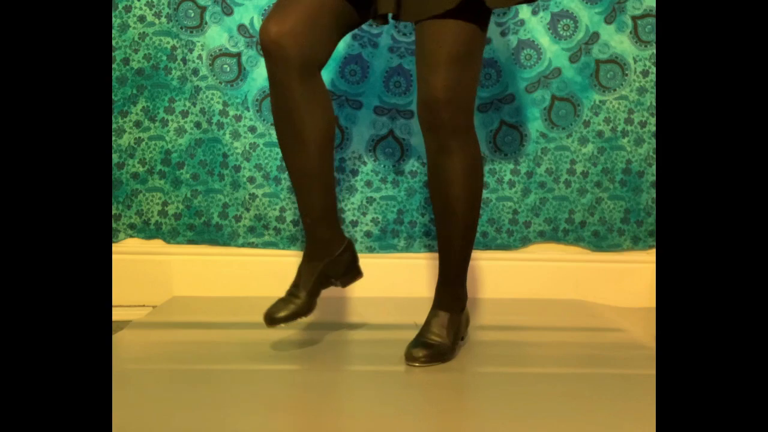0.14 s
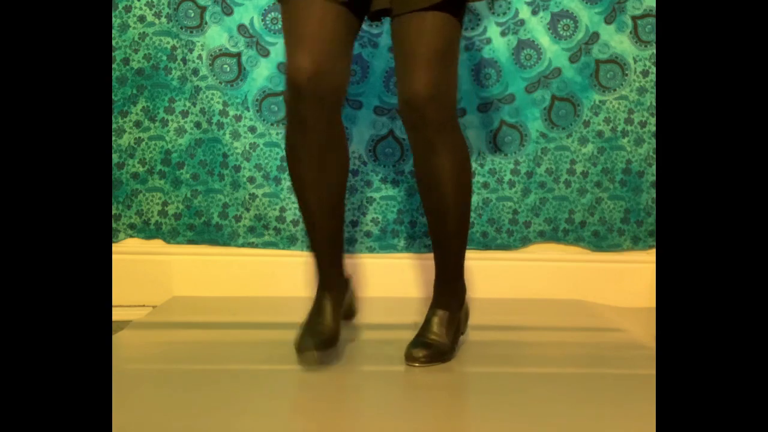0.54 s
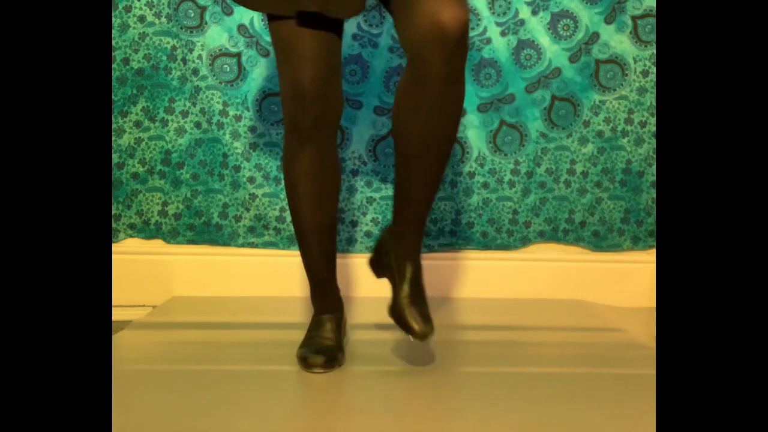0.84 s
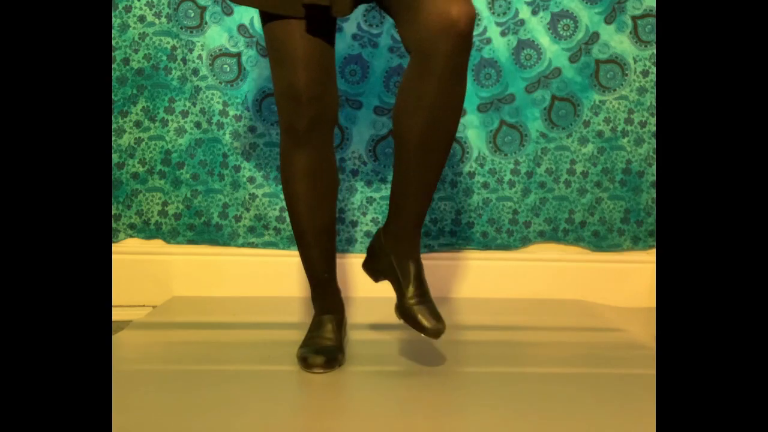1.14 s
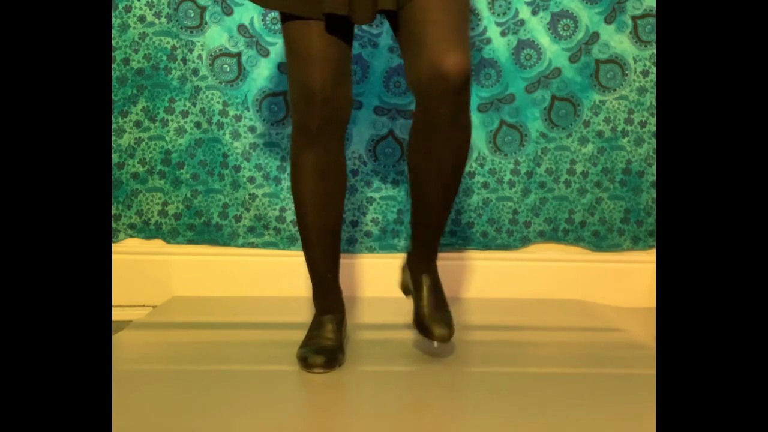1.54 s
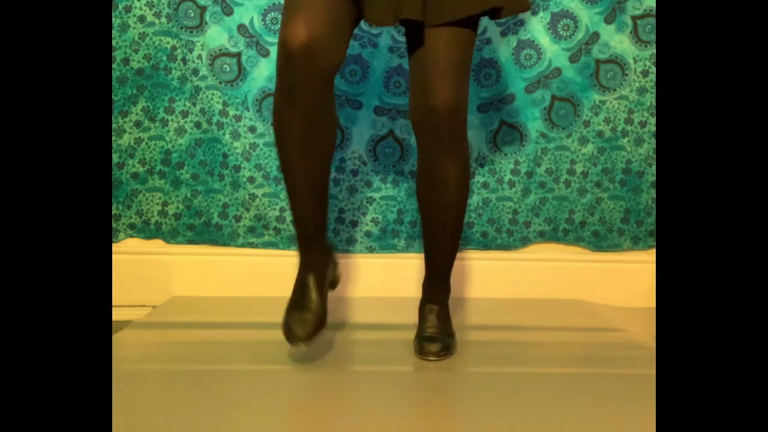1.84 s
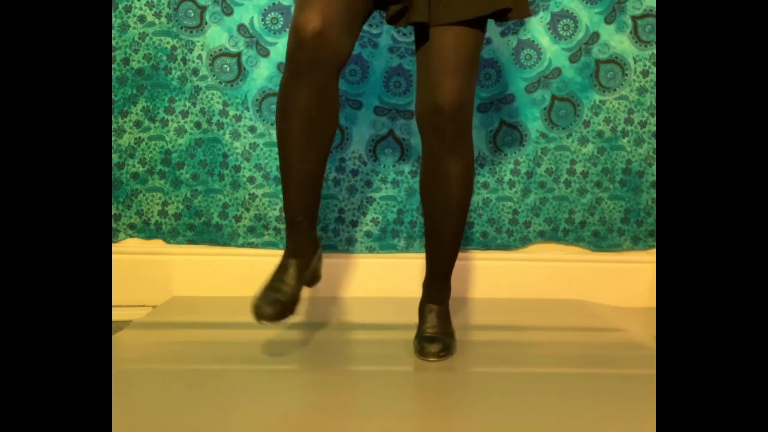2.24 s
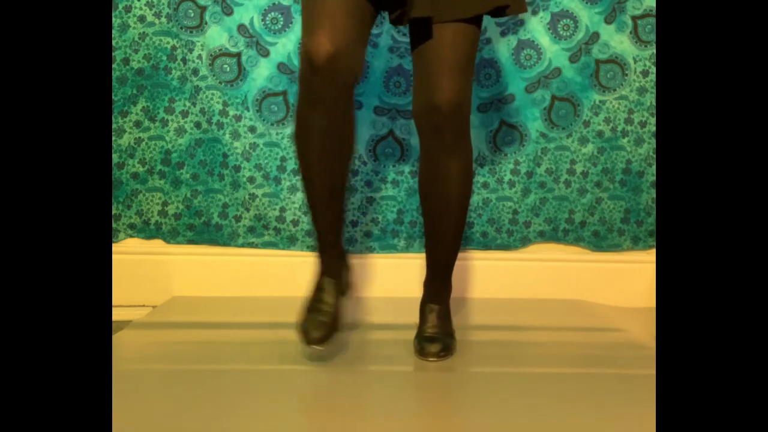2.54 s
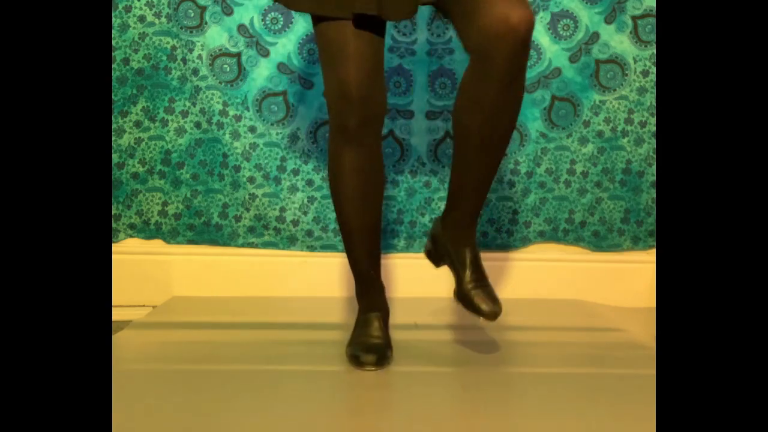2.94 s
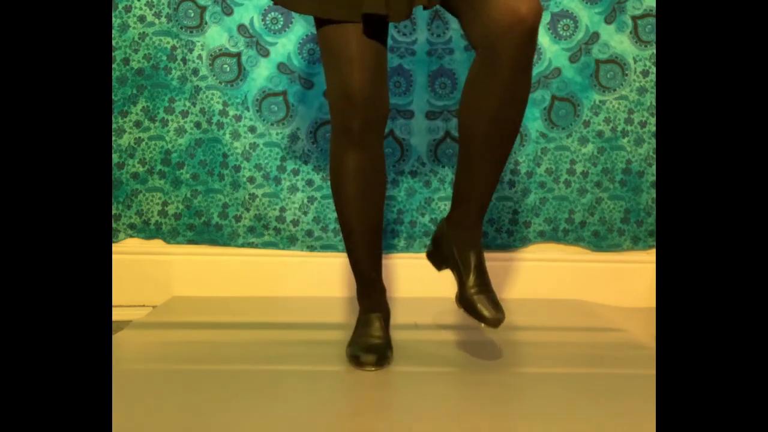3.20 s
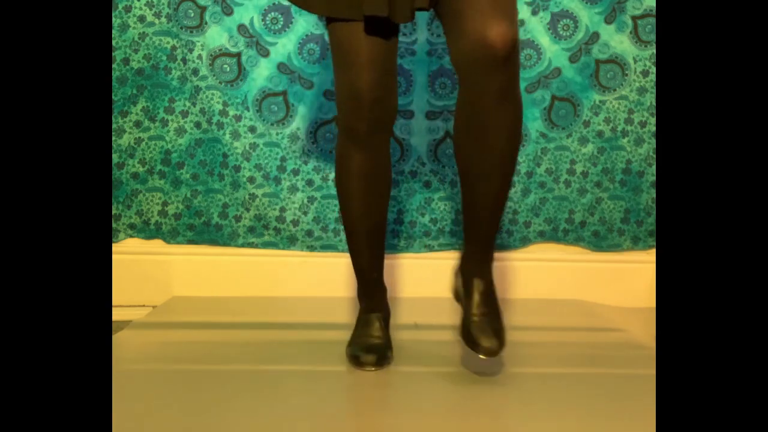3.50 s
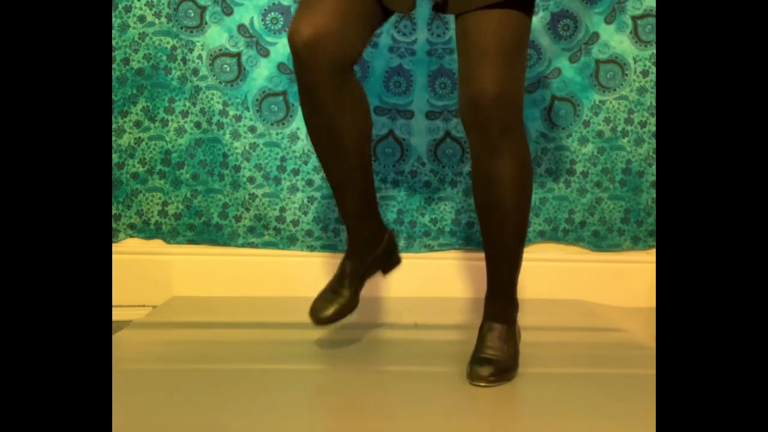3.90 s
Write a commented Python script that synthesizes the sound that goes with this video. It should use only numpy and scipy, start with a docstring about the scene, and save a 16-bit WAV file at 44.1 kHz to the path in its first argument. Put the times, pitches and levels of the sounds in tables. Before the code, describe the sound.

Metal tap shoes land on a hard board four times, about once a second, each a sharp clack with a low thud.

```python
"""A tap dancer hops from foot to foot on a dance board in a small, quiet room, landing once a second.
Each metal toe plate strikes the board and excites its damped modes; the walls return echoes and
reverberation, and the floor booms as it takes the weight. Sometimes a plate touches again lightly.
At first some metal is still ringing; a faint tick, like a clock's, marks the seconds over the hiss."""
import sys
import numpy as np
from scipy import signal
from scipy.fft import rfft, irfft
from scipy.io import wavfile

SR = 44100
rng = np.random.default_rng(int(sys.argv[2]) if len(sys.argv) > 2 else 0)


def transcribe(u):
    """Save the signal u as a 16-bit wav file named by the first command-line argument.

    u: samples, shape (n,) or (channels, n), limited to [-1, 1]; the rate is SR.
    q: integer samples, one column per channel.
    """
    v = np.clip(np.atleast_2d(u).T, -1, 1)
    q = np.round(v * 32767).astype(np.int16)
    wavfile.write(sys.argv[1], SR, q)


N = 178998
AGE = np.arange(SR) / SR  # seconds since a blow


def from_db(db):
    """Amplitude ratio of a level in decibels."""
    return 10 ** (np.asarray(db) / 20)


def rms_one(x):
    """Normalisation to unit rms."""
    return x / np.sqrt(np.mean(x ** 2) + 1e-20)


def at_hz(points, hz):
    """Interpolation of a table on a log-frequency axis."""
    table_hz, value = np.transpose(points)
    return np.interp(np.log(hz + 1), np.log(table_hz), value)


def add(out, start_s, sound):
    """Superposition: a sound joins the mix at start_s."""
    i = max(round(start_s * SR), 0)
    out[i:i + len(sound)] += sound[:len(out) - i]


def ring(modes):
    """Free vibration of damped modes; neighbours start in opposite phase, so close ones swell and beat."""
    return sum((-1) ** k * from_db(db - 60 * AGE / t60) * np.sin(2 * np.pi * hz * AGE)
               for k, (hz, db, t60) in enumerate(modes))


def even_noise(size, window=256, evenness=0.14):
    """Spectral compression spreads the energy of noise a little more evenly over time and frequency."""
    cells = signal.stft(rng.standard_normal(size), nperseg=window)[2]
    return signal.istft(cells / (abs(cells) + 1e-12) ** evenness, nperseg=window)[1][:size]


def faint_knock(low_hz, high_hz, rise_s, fade_s):
    """Reverberation blurs a small contact into a band of noise that swells and decays exponentially."""
    band = signal.butter(2, [low_hz, high_hz], "band", fs=SR, output="sos")
    noise = rms_one(signal.sosfilt(band, rng.standard_normal(SR)))
    return noise * (1 - np.exp(-AGE / rise_s)) * np.exp(-AGE / fade_s)


def air(level_db=-46.5, whine_hz=8330, whine_width_hz=45):
    """Stationary noise: low rumble, faint hiss and a narrow band heard as a thin whine."""
    # spectrum of the still room: frequency_hz, density_db
    spectrum = [(13, -35), (22, -5), (74, -5), (109, -16.5), (160, -15.5), (189, -23.5), (229, -21.5),
                (275, -32), (340, -23.5), (410, -31), (470, -22.5), (580, -30.5), (850, -26), (1100, -33.5),
                (3500, -42.5), (5000, -42.5), (8030, -48), (16000, -55)]
    hz = np.arange(N // 2 + 1) * SR / N
    whine = from_db(-42.5) * np.exp(-((hz - whine_hz) / whine_width_hz) ** 2)  # on the table's dB scale
    gain = np.hypot(from_db(at_hz(spectrum, hz)), whine)
    return from_db(level_db) * rms_one(irfft(rfft(rng.standard_normal(N)) * gain, N))


def clock(first_s=0.392, tick_db=-53.5, tock_db=-56.5, tock_late_s=0.015):
    """Periodic impacts, far and dull, one a second; each tock is softer and a little late."""
    out = np.zeros(N)
    for k, start_s in enumerate(np.arange(first_s, N / SR, 1)):
        late_s, level_db = (tock_late_s, tock_db) if k % 2 else (0, tick_db)
        tick = faint_knock(low_hz=1200, high_hz=2400, rise_s=0.0045, fade_s=0.029)
        add(out, start_s + late_s, from_db(level_db) * tick)
    return out


def fading_ring(wash_db=-49):
    """Free decay: metal struck earlier rings out in a wash of reverberation."""
    # modes of the metal: pitch_hz, level_db, t60_s
    metal_modes = [(333, -37.5, 0.246), (1534, -45.5, 0.33), (1620, -49.5, .4), (1911, -57.5, .5),
                   (3801, -62, .7), (4050, -61.5, .6), (5566, -68.5, .8), (7127, -69.5, 0.93)]
    wash = faint_knock(low_hz=700, high_hz=3600, rise_s=0.0024, fade_s=0.09)
    out = np.zeros(N)
    add(out, 0, ring(metal_modes) + from_db(wash_db) * wash)
    return out


def touches():
    """Grazing contact: a plate meets the board again just after a landing, thin and bright."""
    # light second contacts: start_s, level_db
    contacts = [(0.7400, -48.5), (2.8150, -47), (3.869, -53.5)]
    out = np.zeros(N)
    for start_s, level_db in contacts:
        graze = faint_knock(low_hz=4500, high_hz=12200, rise_s=0.0033, fade_s=0.026)
        add(out, start_s, from_db(level_db) * graze)
    return out


def diffuse_field(colour, resonances, brightness_db_per_octave, resonance_boost_db=3):
    """Reverberation: the shoe's sound scatters round the room, each octave decaying at its own rate."""
    # reverberation times of the room: frequency_hz, t60_s
    room_t60 = [(100, 0.33), (400, 0.28), (1000, 0.29), (2200, 0.29), (4500, .25), (8000, 0.2),
                (15000, 0.25)]
    hz = np.arange(SR // 2 + 1.)
    octave = np.log2(np.clip(hz, 62.5, 16000) / 1000)
    peaks = sum(from_db(db + resonance_boost_db) / (1 + 2 * ((hz - centre) / width) ** 4)
                for centre, width, db in resonances)
    gain = np.hypot(from_db(at_hz(colour, hz)), peaks) * from_db(brightness_db_per_octave * octave)
    noise = rms_one(irfft(rfft(even_noise(SR)) * gain, SR))
    spectrum = rfft(noise)
    out = np.zeros(SR)
    for k in range(-4, 5):
        band = irfft(spectrum * np.maximum(1 - abs(octave - k), 0), SR)
        t60 = at_hz(room_t60, 1000 * 2. ** k)
        out += band * from_db(-60 * AGE / t60)
    return out


def room_build_up(first_share=0.67, bunch_gain=0.85, bunch_s=0.019, width_s=0.005, rise_s=0.00066):
    """Scattered sound starts at once and peaks when the wall reflections arrive together."""
    arrived = first_share + (1 - first_share) * np.minimum(AGE / bunch_s, 1)
    bunch = bunch_gain * np.exp(-((AGE - bunch_s) / width_s) ** 2)
    return (1 - np.exp(-AGE / rise_s)) * (arrived + bunch)


def boom(push_s=0.0058):
    """Forced response: the soft push of the dancer's weight is convolved with the floor's ringing."""
    # modes of the loaded floor: pitch_hz, level_db, t60_s
    floor_modes = [(33.81, -28, 0.77), (64.5, -19, 0.22), (72.9, -13.5, 0.41), (84.24, -20, 0.46)]
    push = np.exp(-(AGE[:SR // 20] / push_s * 2 - 1) ** 2)
    return -signal.fftconvolve(ring(floor_modes), push / push.sum())[:SR]


def snap(low_hz=4000, t60_s=0.005):
    """Hard contact: bare metal touching down gives a brief burst of treble, here with a peak of 1."""
    burst = even_noise(SR, window=32) * from_db(-60 * AGE / t60_s)
    tick = signal.sosfilt(signal.butter(2, low_hz, "high", fs=SR, output="sos"), burst)
    return tick / abs(tick).max()


def clack(thud_db, wall_s=0.0045, wall_db=-8, travel_s=0.0013, snap_db=-16, wall_snap_db=-18):
    """Impact, dispersion and reflection: the plate rings the board, and walls and ceiling repeat it."""
    # modes of the clack (plate and board, plus one faint low room tone): pitch_hz, level_db, t60_s
    clack_modes = [(165, -37, 0.074), (266, -15, 0.023), (451.3, -5.5, 0.013), (1101, 2, 0.0074),
                   (1398, 3, 0.005), (3900, -14, 0.0072)]
    # reflections from the ceiling and far walls: delay_s, level_db
    echoes = [(0.0141, -15.5), (0.0152, -15.5), (0.0195, -18.5)]
    # a flatter landing drives the low modes harder
    modes = [(hz, db + thud_db * (hz < 800), t60) for hz, db, t60 in clack_modes]
    # low bending waves travel slowest (travel_s at 1 kHz), so the blow sweeps downwards
    lag_cycles = 2 * travel_s * np.sqrt(1000 * np.arange(SR // 2 + 1))
    dispersed = irfft(rfft(ring(modes)) * np.exp(-2j * np.pi * lag_cycles), SR)
    direct = dispersed + from_db(snap_db) * snap()
    out = direct.copy()
    for delay_s, level_db in [(wall_s, wall_db), *echoes]:
        add(out, delay_s, from_db(level_db) * direct)
    add(out, wall_s, from_db(wall_snap_db) * snap())  # the wall behind the dancer returns it strongly
    return out


def landings(right_clack_db=1, left_clack_db=2.5, scatter_db=-10.5, boom_db=2):
    """Linear response: clack, reverberation and floor boom all scale with the force of each landing."""
    # right and left foot in turn: start_s, force_db, thud_db, brightness_db_per_octave, weight_lag_s
    hops = [(0.6296, 1.5, 1, -0.5, 0.0098), (1.6638, -1.44, -1, 0, 0.03), (2.7124, -4, 2.5, -0.46, 0.0372),
            (3.7058, 0.42, -6, 0.46, 0.0075)]
    # broad spectrum of each shoe in the room: frequency_hz, density_db
    right_colour = [(60, -13.5), (170, -4), (290, -3), (520, 0.5), (740, -1.5), (1180, -3.5), (1600, -3),
                    (2050, -5.5), (2800, -13.5), (3900, -8), (5200, -11), (6500, -17.5), (10500, -23.5),
                    (15500, -34.5)]
    left_colour = [(60, -16.5), (130, -3.5), (300, -2.5), (470, -5), (760, -4.5), (1200, -0.5),
                   (2100, -1.5), (2700, -3.5), (3700, -5.5), (4700, -11), (5900, -8.5), (8000, -13),
                   (13000, -27.5), (15800, -35)]
    # resonances of each shoe with its spot on the board: pitch_hz, width_hz, level_db
    right_resonances = [(196, 25, -5.5), (410.3, 30, -5), (470, 18, 0.5), (558, 35, 3), (906, 52, -4),
                        (1142, 120, -5), (1399, 160, -9), (1944, 140, -5.5), (3350, 86, -8.5),
                        (4010, 56, -6), (4356, 130, -9.5), (4946, 220, -12.5), (5850, 80, -19)]
    left_resonances = [(162.2, 15, -1), (260, 25, -7), (383, 22, 0), (463, 45, 2.5), (645, 30, -2.5),
                       (930, 120, -3.5), (1034, 27, -0.5), (1280, 34, -7.5), (1490, 47, -9.5),
                       (1850, 86, -6.5), (2010, 64, -4), (2250, 71, -3.5), (3090, 51, -5.5),
                       (3600, 140, -8), (4000, 81, -8), (5650, 250, -15), (7500, 190, -21)]
    feet = [(right_colour, right_resonances, right_clack_db),
            (left_colour, left_resonances, left_clack_db)]
    out = np.zeros(N)
    for k, (start_s, force_db, thud_db, brightness_db_per_octave, weight_lag_s) in enumerate(hops):
        colour, resonances, clack_db = feet[k % 2]
        scattered = diffuse_field(colour, resonances, brightness_db_per_octave) * room_build_up()
        add(out, start_s, from_db(force_db + clack_db) * clack(thud_db))
        add(out, start_s, from_db(force_db + scatter_db) * scattered)
        add(out, start_s + weight_lag_s, from_db(force_db + boom_db) * boom())
    return out


def scene():
    """Superposition of dancer and room at one point."""
    return (landings() + touches() + fading_ring() + clock() + air())[None]


def record(dry, ceiling=0.96, cutoff_hz=16000):
    """Soft saturation rounds the loudest peaks; a low-pass filter cuts the highest treble."""
    rounded = dry / (1 + (dry / ceiling) ** 6) ** (1 / 6)
    return signal.sosfilt(signal.cheby1(12, 0.2, cutoff_hz, fs=SR, output="sos"), rounded)


dry = scene()
out = record(dry)
transcribe(out)
```